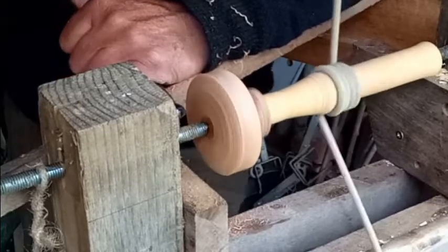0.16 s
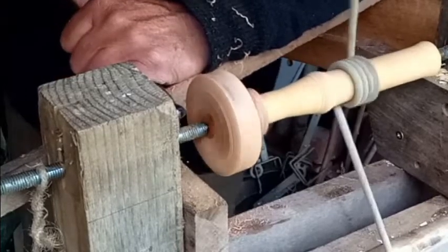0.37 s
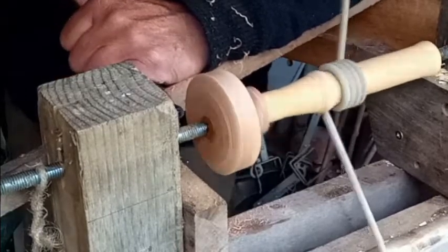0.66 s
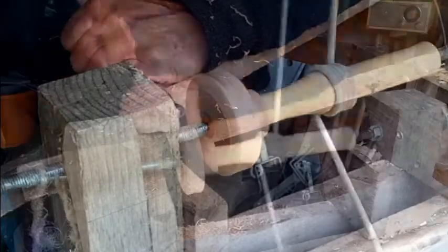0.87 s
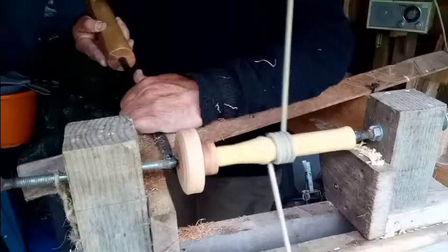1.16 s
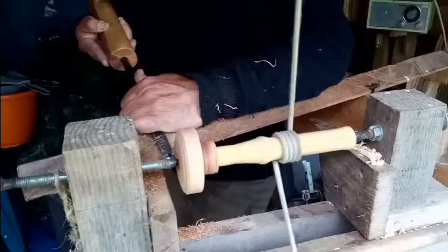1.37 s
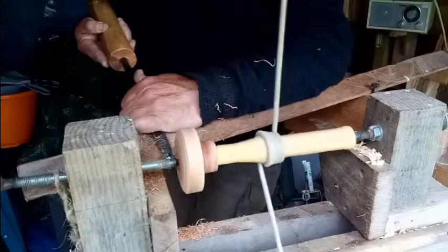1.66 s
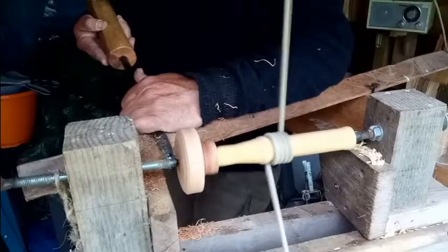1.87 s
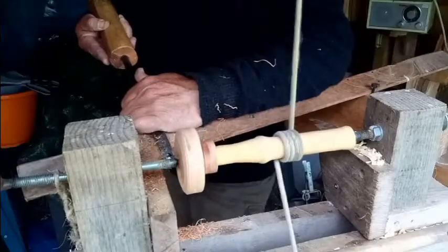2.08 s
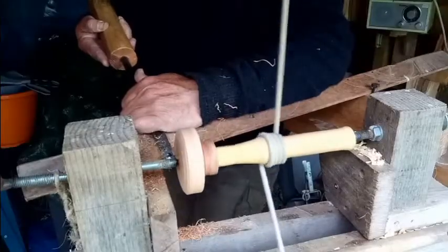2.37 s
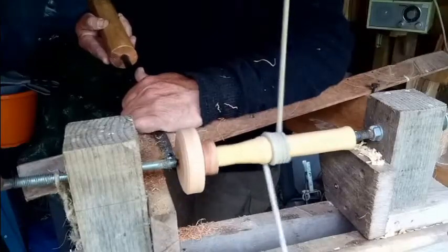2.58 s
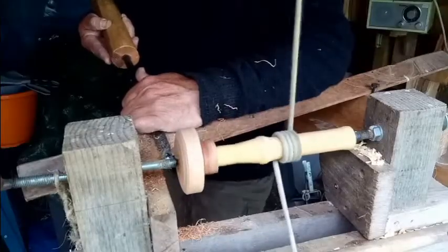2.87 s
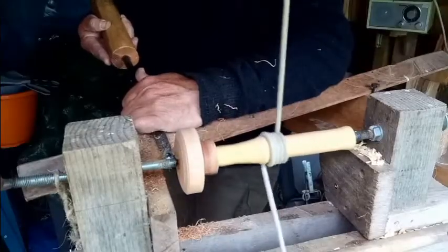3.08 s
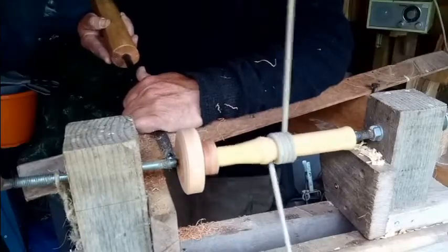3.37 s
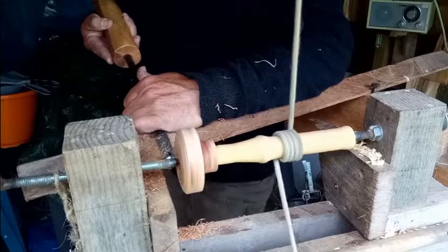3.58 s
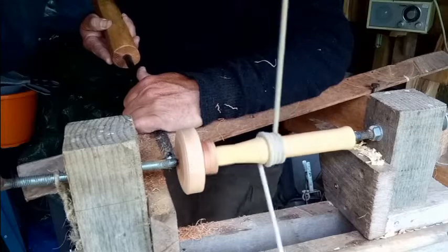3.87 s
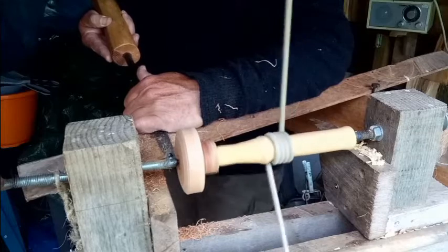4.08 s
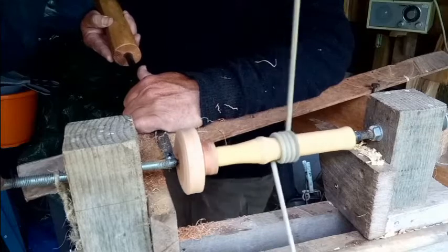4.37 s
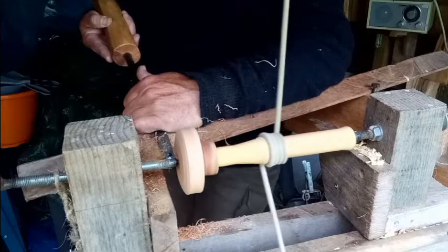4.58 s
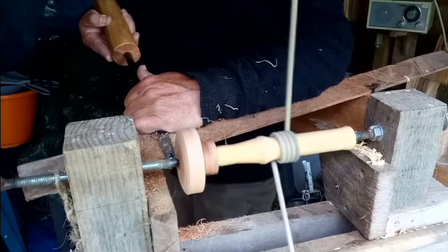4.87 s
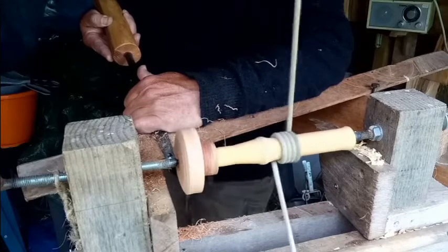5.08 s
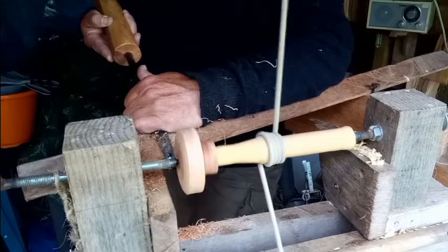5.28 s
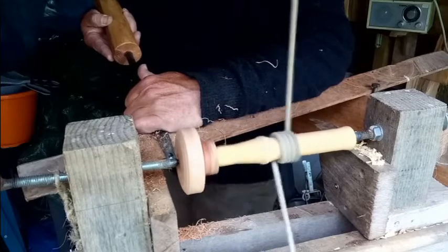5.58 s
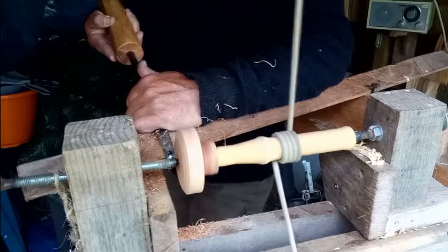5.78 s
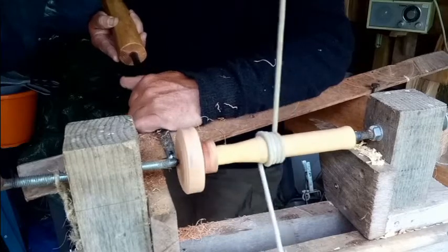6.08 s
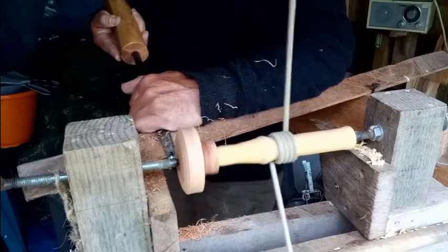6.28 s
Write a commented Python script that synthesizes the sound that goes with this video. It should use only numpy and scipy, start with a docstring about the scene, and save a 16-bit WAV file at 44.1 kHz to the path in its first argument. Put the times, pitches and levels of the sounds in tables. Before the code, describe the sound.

Close, rhythmic scraping of a steel tool cutting wood on a treadle lathe, the frame knocking and the blade ticking between cuts.

```python
"""A gouge cuts a wooden disc on a foot-powered pole lathe, heard from close by in a small workshop.
At each push of the treadle, snapping fibres excite the resonances of work and blade: a rasp that sinks
and coarsens to a stick-slip judder as the wood slows. The treadle bottoms out and strikes the frame
into free vibration. The cord then spins the work back with a rub, a groan and faint chirps, and the
steel ticks against the wood before the next cut. The walls add a short reverberation."""
import sys
import numpy as np
from scipy import signal
from scipy.fft import rfft, irfft, next_fast_len
from scipy.io import wavfile
from scipy.ndimage import uniform_filter1d, map_coordinates

SR = 44100
rng = np.random.default_rng(int(sys.argv[2]) if len(sys.argv) > 2 else 0)


def to_wav(sig):
    """Store sig (one row per channel, or 1-D mono) as 16-bit WAV at the path in sys.argv[1].

    Samples outside -1..1 are clipped; the rate is SR.
    """
    pcm = np.clip(np.atleast_2d(sig), -1, 1) * 32767
    pcm = np.round(pcm).astype(np.int16)
    wavfile.write(sys.argv[1], SR, pcm.T)  # frames by channels


N = 284000

# Levels in the tables are relative; each source applies its own gain.
AIR_SPECTRUM = [(20, -20), (50, -18), (85, 1), (130, -7), (330, -5.5), (550, -22), (720, -2.5), (1300, -12),
                (2600, -15.5), (3500, -22.5), (6400, -19), (10400, -35), (15500, -35)]  # background noise of the room: f/Hz, level/dB
ROOM_MODE = [(96, 23, 11)]  # low room resonance: f/Hz, width/Hz, lift/dB
REVERB_TIMES = [(150, 0.13), (1000, 0.22), (5000, 0.086), (12000, 0.05)]  # decay of the workshop: f/Hz, t60/s
COHERENCE = [(100, 0.93), (300, 0.87), (700, 0.45), (1400, 0.12), (3100, 0.056), (6800, 0.65), (12000, .1)]  # likeness of left and right: f/Hz, correlation
LEFT_BIAS = [(100, 1.5), (1000, 1.1), (2500, 2), (4300, 6.5), (5500, 7.5), (7000, 7.5), (8000, 20),
             (11000, 8.5), (15000, 16)]  # left minus right: f/Hz, level/dB

# the pole spins the work back: t/s, length/s, rub level/dB, groan level/dB, delay of the groan's peak/s
RETURN_SPINS = [(-0.15, 0.2, -56, -45, 0.14), (0.591, 0.29, -58, -54, 0.2), (1.397, 0.32, -61.5, -60, 0.24),
                (2.202, 0.2, -60.5, -56, 0.093), (2.935, 0.18, -60, -51, 0.13),
                (3.71, 0.19, -62.5, -53.5, 0.045), (4.456, 0.16, -57, -61, 0.1),
                (5.136, 0.2, -64.5, -57.5, 0.12), (5.87, 0.17, -60.5, -52.5, 0.052)]
RUB_SPECTRUM = [(200, -11.5), (400, -11.5), (600, -10.5), (950, -24.5), (1400, -15.5), (2700, -24.5),
                (3500, -26), (6500, -24.5), (8500, -38.5), (11000, -45.5), (15500, -35.5)]  # cord sliding on the spindle: f/Hz, level/dB
POINT_MODES = [(470, 120, -1.5), (1270, 220, 4), (2380, 31, 12.5), (2850, 660, 7), (3750, 28, 7.5),
               (5500, 240, 1.5), (6530, 360, 3)]  # the work ringing on its steel points: f/Hz, width/Hz, lift/dB
GROAN_SPECTRUM = [(100, -28), (170, -11), (260, -6.5), (340, -12), (430, -5), (490, 4.5), (560, -18),
                  (740, -9.5), (1000, -41), (3000, -100)]  # the spindle groaning: f/Hz, level/dB
SPINDLE_CHIRPS = [(0.648, 3750, -65, 0.047), (0.744, 2790, -60.5, 0.067), (0.83, 6500, -71, 0.11),
                  (1.453, 3690, -66, 0.097), (3.0, 5600, -68, .08), (4.55, 2610, -79, 0.1),
                  (5.27, 4600, -70.5, 0.11)]  # the spindle chirping on its points: t/s, f/Hz, level/dB, length/s

# the edge touching the wood: t/s, level/dB, low ring/dB, high ring/dB, skitter t60/s
EDGE_TOUCHES = [(0.131, -35, -29, -31, .17), (0.209, -44, -19, -25, 0.067),
                (2.4547, -19.5, -16.5, -31, 0.17), (2.514, -14.5, -14.5, -26, 0.083),
                (3.1739, -20, -15.5, -26.5, 0.14), (3.234, -18, -20, -29, 0.3), (3.939, -32, -15, -34, .22),
                (3.992, -16, -22, -18.5, 0.33), (4.735, -21, -39, -19, .2), (6.0758, -29, -43, -32, 0.18),
                (6.105, -32.5, -14, -40, 0.41), (6.1542, -23.5, -14, -19, 0.49)]
GOUGE_MODES = [(685, -7.5, 0.2), (1330, -15, 0.15), (1741, 10, 0.085), (2102, 13.5, 0.03),
               (3423, 7.5, 0.047), (3660, 11, 0.037), (4130, 16, 0.046), (4654, 7.5, 0.048),
               (5300, -20, .035), (7050, 5, 0.045)]  # the lightly held gouge: f/Hz, level/dB, t60/s
BLADE_RADIATION = [(150, -20), (600, 5), (7500, -4), (9000, -6)]  # the thin blade radiates little bass or top: f/Hz, level/dB

# blows of treadle on frame: t/s, level/dB, crack/dB, boom/dB, favoured f/Hz
FRAME_BLOWS = [(0.459, -16, -23.5, -50, 357), (0.479, -30.5, -41, -14, 300), (0.552, -40, -29, -1, 576),
               (0.585, -45, -5.5, -17, 476), (1.261, -35, -16, -9, 290), (2.074, -26, -34, -21, 240),
               (2.122, -24, -21, -22, 290), (2.149, -28.5, -36, -28, 297), (2.207, -37.5, -33, -23, 285),
               (2.272, -42, -28, -26, 320), (2.77, -30.5, -16, -28, 417), (2.798, -32.5, -32, -19, 240),
               (2.842, -41.5, -36, -21, 255), (3.593, -40, -21.5, -26, 492), (3.608, -25, -9.5, -55, 472),
               (3.635, -38, -31, -3, 150), (3.679, -33.5, -35, -33, 354), (4.222, -40, -28, -10, 150),
               (4.33, -46.5, -35, -37, 405), (4.944, -35.5, -26, -10, 660), (5.652, -25, -25, -22, 290),
               (5.67, -11.5, -32, -19.5, 348), (5.734, -28, -36, -20, 383), (5.873, -43.5, -12, -21, 477),
               (6.372, -28.5, -28, -23, 496)]
FRAME_MODES = [(92.5, -14, 0.36), (151.5, -17, 0.41), (240, -9, 0.2), (290, -12.5, 0.17),
               (354.7, -10.5, 0.11), (403.4, -6.5, 0.13), (486, 3.5, 0.033), (518.4, -7, 0.14),
               (659, -11.5, 0.18), (727, -22, 0.32), (864, -21.5, 0.23), (1264, -13, 0.068)]  # the struck frame: f/Hz, level/dB, t60/s
# the dry crack of a blow: f/Hz, level/dB
CRACK_SPECTRUM = [(500, 13), (1500, -7), (3500, 2), (6500, -8), (8200, -30), (10000, -48), (15000, -59)]
# the open frame is too small to radiate deep bass: f/Hz, level/dB
FRAME_RADIATION = [(30, -18), (60, -6.5), (90, -3.5), (130, 0.5)]
SHUDDER_SPECTRUM = [(25, -64), (50, -11), (95, 0), (125, -22), (170, -4), (250, -1), (360, -3), (470, 1),
                    (580, -8.5), (700, 0.5), (1100, -19.5), (1600, -14), (2500, -29), (5000, -76)]  # the shaken frame: f/Hz, level/dB

# one cut per push: full bite t/s, hold/s, bite level/dB, attack/s, release/s,
# wood tone against the bite/dB, judder level/dB, then lift/dB at each of the GRIP_MODES
CUTS = [(0.238, 0.2, -30.5, 0.035, 0.056, -8, -39, -5, 6.5, 2.5, 0, 4),
        (0.99, 0.25, -30, 0.042, 0.084, -7.5, -40, -1, -4, 0.5, -1.5, 1),
        (1.818, 0.21, -30.5, 0.03, 0.057, -10.5, -40, 3.5, 6.5, -3, 4.5, -2),
        (2.543, 0.21, -30.5, 0.051, 0.05, -9.5, -42, 2, 2, 0, 5, -3.5),
        (3.288, 0.215, -30, 0.083, 0.058, -8, -41, 4, -4.5, -1, 3, -1.5),
        (4.034, 0.2, -29.5, 0.043, 0.054, -8.5, -45.5, 2.5, -1, -1, 1.5, -3),
        (4.776, 0.19, -29.6, 0.036, 0.047, -8, -49, 2, 1.5, -3, -1, -3),
        (5.488, 0.14, -29.5, 0.016, 0.093, -11.5, -47.5, -3.5, 3, 0.5, 7.5, -0.5),
        (6.19, 0.2, -30.5, 0.03, 0.073, -8.5, -45.5, 5, -4.5, -1, 0.5, -2.5)]
GRIP_MODES = [(780, 43), (1040, 89), (3150, 280), (3830, 94), (6110, 630)]  # resonances of work and steel that vary with the grip: f/Hz, half-width/Hz
RASP_SPECTRUM = [(60, -39.5), (280, -14), (420, -16.5), (700, -12), (1400, -22.5), (1700, -12),
                 (2700, -9.5), (4300, -11), (4850, -15.5), (7200, -11), (8000, -26.5), (10000, -28),
                 (13500, -29), (15300, -23.5)]  # tearing fibres: f/Hz, level/dB
BODY_MODES = [(490, 74, 8.9), (780, 97, 8.8), (1040, 133, 11.8), (1280, 117, 7.0), (1560, 63, 7.5),
              (1780, 130, 6.3), (2060, 69, 2.3), (2410, 117, 4.8), (3150, 145, 5.8), (3510, 180, 3.0),
              (3830, 94, 8.6), (4070, 79, 5.0), (4370, 135, 2.5), (4580, 73, 6.0), (5280, 90, 4.6),
              (6100, 240, 9.6), (6620, 98, 6.4), (7090, 285, 8.8), (9070, 167, 5.6), (11010, 544, 5.6)]  # resonances of work, rest and gouge: f/Hz, width/Hz, lift/dB
FALLING_TONE = [(0, 1560), (.38, 1240), (.6, 950), (.76, 520), (1, 260)]  # the tone of a cut as the wood slows: share of the stroke, f/Hz
ENTRY_SQUEAKS = [(0.215, 5300, -46.5, 0.018), (0.962, 5300, -57, 0.025)]  # the edge entering the wood: t/s, f/Hz, level/dB, length/s

LEAD_S, TRAIL_S = 0.065, 0.12  # the edge grazes the wood before and after the hold


def amp(db):
    """Amplitude ratio of a level in decibels."""
    return 10 ** (np.asarray(db) / 20)


def unit(x):
    """Normalisation to rms 1."""
    return x / np.sqrt(np.mean(x ** 2) + 1e-20)


def along(points, hz):
    """Interpolation of (f/Hz, value) points on a logarithmic frequency axis."""
    f, v = np.transpose(points)
    return np.interp(np.log(hz + 1), np.log(f + 1), v)


def shape(spectrum, resonances, hz):
    """Level in dB of a broad spectrum with Lorentzian resonance peaks on it."""
    return along(spectrum, hz) + sum(db / (1 + (2 * (hz - f) / w) ** 2) for f, w, db in resonances)


def wobble(rate):
    """Smooth random modulation, rate knots a second."""
    return map_coordinates(rng.standard_normal(int(N * rate / SR) + 4), [np.arange(N) * rate / SR])


def filtered(x, response):
    """Linear filtering: the spectrum of x times a frequency response."""
    m = next_fast_len(N + SR // 2)
    return irfft(rfft(x, m) * response(np.fft.rfftfreq(m, 1 / SR)), m)[..., :N]


def below(x, edge_hz):
    """Zero-phase low-pass, so that bands can be split by subtraction."""
    return filtered(x, lambda hz: 1 / (1 + (hz / edge_hz) ** 12))


def causal(db):
    """Minimum-phase response with these levels: it rings only after it is struck."""
    cepstrum = irfft(np.log(amp(db) + 1e-6))
    half = len(cepstrum) // 2
    return np.exp(rfft(np.r_[cepstrum[0], 2 * cepstrum[1:half], np.zeros(half)]))


def spread(pair):
    """Partial coherence: two independent signals become left and right, most alike in the bass."""
    turn = lambda hz: np.arccos(np.clip(along(COHERENCE, hz), -1, 1)) / 2
    mid, side = filtered(pair, lambda hz: np.array([np.cos(turn(hz)), np.sin(turn(hz))]))
    return np.array([mid + side, mid - side])


def coloured(pair, spectrum, resonances=()):
    """Source and filter: an excitation takes on a spectrum and resonances, in stereo at rms 1."""
    return unit(filtered(spread(pair), lambda hz: causal(shape(spectrum, resonances, hz))))


def snaps(rate, scatter_db):
    """Shot noise: random impulses of uneven size, rate a second."""
    sizes = amp(scatter_db * np.clip(rng.standard_normal(N), -2, 2))
    return unit((rng.random(N) < rate / SR) * sizes * rng.standard_normal((2, N)))


def add(track, s, sound):
    """Superposition of a sound on the track at time s."""
    part = track[:, max(round(s * SR), 0):][:, :sound.shape[-1]]
    part += sound[..., :part.shape[1]]


def phases(s, length):
    """Envelope clocks: seconds to go until s, share of the length done, seconds since its end."""
    t = np.arange(N) / SR
    return np.maximum(s - t, 0), np.clip((t - s) / length, 0, 1), np.maximum(t - s - length, 0)


def room_air():
    """Ambient noise: a faint steady wash, coloured by one low room resonance."""
    return amp(-66) * coloured(rng.standard_normal((2, N)), AIR_SPECTRUM, ROOM_MODE)


def reverberation(x):
    """Diffuse reflection from the walls decays exponentially, differently at each side."""
    hz, t, noise = signal.stft(rng.standard_normal((2, SR // 2)), SR, nperseg=256)
    decay = amp(-60 * t / along(REVERB_TIMES, hz)[:, None])
    tail = signal.istft(noise * decay, SR, nperseg=256)[1]
    tail = np.pad(tail / np.linalg.norm(tail[0]), ((0, 0), (200, 0)))  # 4.5 ms after the direct sound
    return signal.fftconvolve(x, tail, axes=1)[:, :N]


def squeaks(rows):
    """Friction tones: each is a sinusoid, unsteady in level and phase, that swells and fades."""
    t = np.arange(N) / SR
    out = np.zeros(N)
    for s, hz, db, length in rows:
        swell = amp(db + 4.5 * wobble(130)) * np.exp(-(2 * (t - s) / length) ** 2)
        out += swell * np.sin(2 * np.pi * hz * t + 1.4 * wobble(260))
    return out


def cord_return():
    """Sliding friction: the cord rubs round the spindle, which groans and chirps on its steel points."""
    ends_db_per_s, groan_db_per_s = 290, 141
    t = np.arange(N) / SR
    rub_gain, groan_gain = np.zeros((2, N))
    for s, length, rub_db, groan_db, groan_delay in RETURN_SPINS:
        before, share, after = phases(s, length)
        ends_db = -ends_db_per_s * (before + after)
        arch_db = -1.5 * (2 * share - 1) ** 2  # loudest half way, where the work spins fastest
        rub_gain += amp(rub_db + ends_db + arch_db)
        groan_gain += amp(groan_db + ends_db - groan_db_per_s * np.abs(t - s - groan_delay))
    flutter = amp(0.5 + 2.4 * wobble(32))
    rub = flutter * coloured(snaps(rate=9000, scatter_db=-3), RUB_SPECTRUM, POINT_MODES)
    groan = amp(-2) * coloured(snaps(rate=570, scatter_db=2.5), GROAN_SPECTRUM)
    return rub_gain * rub + groan_gain * groan + squeaks(SPINDLE_CHIRPS)


def gouge_ticks():
    """Repeated light impact: the edge skitters on the wood and excites the damped modes of the gouge."""
    out, t = np.zeros((2, N)), np.arange(SR // 4) / SR
    for s, db, low_db, high_db, skitter_t60 in EDGE_TOUCHES:
        tilt = [(2200, low_db + 20), (3400, 0.0048), (5000, 0), (7000, high_db + 34.5)]
        ring = np.zeros(len(t))
        for hz, level, t60 in GOUGE_MODES:
            mode_db = level + along(tilt, hz) + rng.normal(0, 1.5)
            ring += amp(mode_db - 60 * t / t60) * np.sin(2 * np.pi * hz * t)
        grit = 0.53 * amp(-60 * t / 0.0027) * rng.standard_normal(len(t))
        rise = 1 - np.exp(-t / 0.0024)
        skitter = rise * amp(-60 * t / skitter_t60) * rng.standard_normal((2, len(t)))
        tick = signal.fftconvolve(skitter, (ring + grit)[None], axes=1)[:, :len(t)]
        add(out, s, amp(db - 10) * tick / np.abs(tick).max())
    return filtered(out, lambda hz: causal(along(BLADE_RADIATION, hz)))


def frame_knocks():
    """Impact excitation: the treadle bottoms out and the frame rings, with a rattle and a dry crack."""
    rise_s = 0.0019  # the treadle lands softly, so the rattle and dry crack take a moment to build up
    out, t = np.zeros((2, N)), np.arange(SR // 2) / SR
    rise = 1 - np.exp(-t / rise_s)
    rattle_noise = coloured(rng.standard_normal((2, N)), SHUDDER_SPECTRUM)
    crack_noise = coloured(rng.standard_normal((2, N)), CRACK_SPECTRUM)
    for s, db, crack_db, boom_db, tone_hz in FRAME_BLOWS:
        weight = [(150, boom_db + 17.5), (300, 0.012)]  # boom sets how strongly the lowest modes ring
        spot = [(tone_hz, 110, 10)]  # the spot that is struck favours some modes
        ring = np.zeros(len(t))
        for k, (hz, level, t60) in enumerate(FRAME_MODES):
            mode_db = level + shape(weight, spot, hz) + 2 * rng.standard_normal()
            detuned_hz = hz * (1 + rng.normal(0, 0.026))
            ring += (-1) ** k * amp(mode_db - 60 * t / t60) * np.sin(2 * np.pi * detuned_hz * t)
        span = (round(s * SR) + np.arange(len(t))) % N
        rattle = 0.23 * amp(-60 * t / 0.22) * rattle_noise[:, span]
        crack = amp(crack_db + 6 - 60 * t / 0.17) * crack_noise[:, span]
        add(out, s - rise_s, amp(db - 4) * (ring / np.abs(ring).max() + rise * (rattle + crack)))
    return filtered(out, lambda hz: causal(along(FRAME_RADIATION, hz)))


def judder(shaking):
    """Stick-slip: as the wood slows, the slips grow coarse and shake the frame."""
    slips = snaps(rate=700, scatter_db=1) + 0.5 * rng.standard_normal((2, N))
    return shaking * coloured(slips, SHUDDER_SPECTRUM)


def treadle_pushes():
    """Amplitude envelopes of bite, wood tone and judder: each cut rises, holds and dies exponentially."""
    edge_db = 22  # gained in one attack time, lost in one release time
    arch_db, wood_rise_db = 2.5, 6.5  # over the hold the bite arches and the slowing wood's tone grows
    build_db_per_s, die_db_per_s = 148, 161  # the judder peaks as the hold ends
    bite, wood_tone, shaking = np.zeros((3, N))
    for s, hold, db, attack, release, wood_db, judder_db, *_ in CUTS:
        before, share, after = phases(s, hold)
        bite_db = db - arch_db * (2 * share - 1) ** 2 - edge_db * (before / attack + after / release)
        bite += amp(bite_db)
        slowing = share - 0.5 + np.minimum(after, TRAIL_S) / hold
        wood_tone += amp(bite_db + wood_db + wood_rise_db * slowing)
        building, _, dying = phases(s + hold, length=0.0083)
        swell_db = -build_db_per_s * building - die_db_per_s * dying
        shaking += amp(judder_db + swell_db - edge_db * before / attack)
    return bite, wood_tone, shaking


def contacts():
    """Contact interval of edge and wood for each cut: start/s, end/s."""
    return [(s - LEAD_S, s + hold + TRAIL_S) for s, hold, *_ in CUTS]


def scattered(x, t60, wet_db):
    """Multiple reflection: each snap runs to and fro through rest and bed, by new paths in every cut."""
    out, t = np.zeros((2, N)), np.arange(SR // 8) / SR
    for start, end in contacts():
        echoes = rng.standard_normal((2, len(t))) * amp(-60 * t / t60)
        paths = (t == 0) + amp(wet_db) * echoes / np.linalg.norm(echoes[0])
        cut = x[:, round(start * SR):round(end * SR)]
        add(out, start, signal.fftconvolve(cut, paths / np.linalg.norm(paths[0]), axes=1))
    return out


def moving_contact(rasp, patchy_db, hump_db):
    """Modal coupling shifts as the contact travels round the disc; the tone sinks as the wood slows."""
    hz, t, spectra = signal.stft(rasp, SR, nperseg=1024, noverlap=768)
    contact_s = np.ravel(contacts())
    share = np.interp(t, contact_s, np.tile([0, 1], len(CUTS)))
    tone_hz = np.interp(share, *np.transpose(FALLING_TONE))
    octaves = np.log2((hz[:, None] + 1) / tone_hz)
    # a broad hump at the tone, and little energy more than an octave under it
    gain_db = hump_db * np.exp(-(octaves / 0.22) ** 2) - 17 * np.clip((-octaves - 0.75) / 1.19, 0, 1)
    # how the gouge is held in each cut changes the ring of work and steel
    for (centre, width), lifts_db in zip(GRIP_MODES, np.transpose(CUTS)[-len(GRIP_MODES):]):
        band = np.exp(-((hz[:, None] - centre) / width) ** 2)
        gain_db += band * np.interp(t, contact_s, np.repeat(lifts_db, 2))
    patches = uniform_filter1d(rng.standard_normal(spectra.shape[1:]), size=4, axis=0)
    gain_db += patchy_db * unit(uniform_filter1d(patches, size=11, axis=1))
    return signal.istft(spectra * amp(gain_db), SR, nperseg=1024, noverlap=768)[1][:, :N]


def steady(x):
    """Normalisation to about rms 1 over each 0.1 s, so that the push on the tool sets the loudness."""
    power = np.abs(uniform_filter1d(np.mean(x ** 2, axis=0), size=SR // 10))
    return x / np.sqrt(power + np.mean(x ** 2) / 20)


def gouge_cut(bite, wood_tone):
    """Fracture noise: fibres snap in quick clusters under the edge and ring the work and the blade."""
    grain_hz, grain_db = 33, 1.1  # the grain passes the edge twice a turn and makes the cut throb
    throb_db = grain_db * np.sin(2 * np.pi * grain_hz * np.arange(N) / SR + 0.73 * wobble(14))
    clusters = amp(throb_db + 0.61 * wobble(75) + 0.21 * wobble(350))  # the shaving breaks in short runs
    fibres = clusters * scattered(snaps(rate=12000, scatter_db=2.5), t60=0.066, wet_db=-2.5)
    rasp = moving_contact(coloured(fibres, RASP_SPECTRUM, BODY_MODES), patchy_db=2.5, hump_db=2)
    wood = below(rasp, edge_hz=1910)
    scrape = below(rasp, edge_hz=5200) - wood
    hiss = rasp - below(rasp, edge_hz=7400)
    blade = rasp - wood - scrape - hiss
    blade *= amp(2.6 * wobble(110))  # the blade chatters in short bursts
    bite_db = 20 * np.log10(bite + 1e-9)
    hiss *= amp(np.clip(bite_db + 32, -11, 2) + 0.55 * wobble(500))  # only a hard bite splinters finely
    edge = bite * steady(scrape + blade + hiss)
    return edge + amp(3.5) * wood_tone * steady(wood) + squeaks(ENTRY_SQUEAKS)


def scene():
    """Superposition of lathe, reverberation and room noise; a level difference leans the treble left."""
    bite, wood_tone, shaking = treadle_pushes()
    lathe = gouge_cut(bite, wood_tone) + judder(shaking) + frame_knocks() + gouge_ticks() + cord_return()
    heard = lathe + amp(-14) * reverberation(lathe)
    sides = lambda hz: amp(np.outer([0.5, -0.5], along(LEFT_BIAS, hz)))
    heard = filtered(heard, lambda hz: sides(hz) / sides(hz).mean(axis=0))
    return heard + room_air()


def record(dry):
    """Band limiting: a steep low-pass removes the highest treble."""
    top_hz = 15600
    return filtered(dry, lambda hz: 1 / np.sqrt(1 + (hz / top_hz) ** 240))


dry = scene()
out = record(dry)
to_wav(out)
```